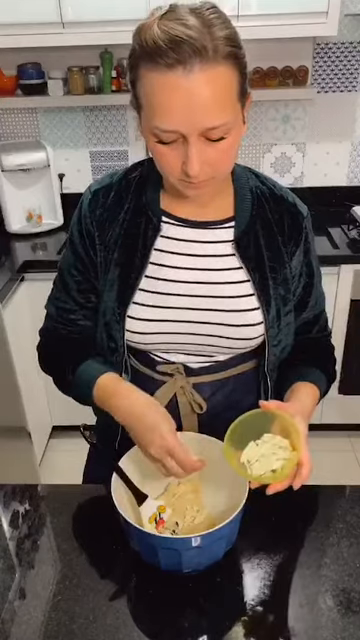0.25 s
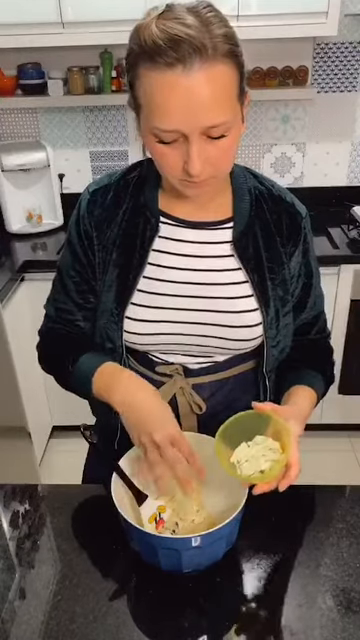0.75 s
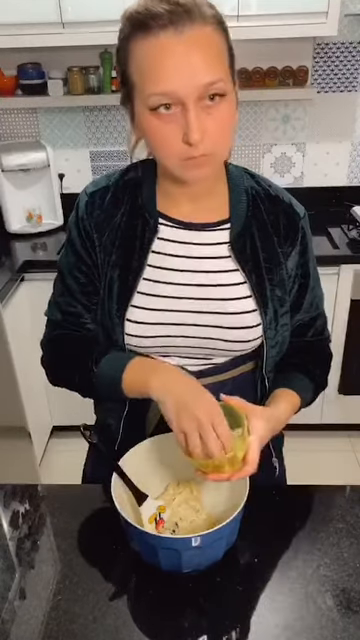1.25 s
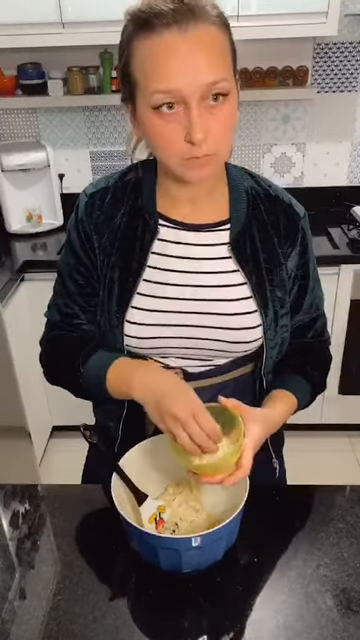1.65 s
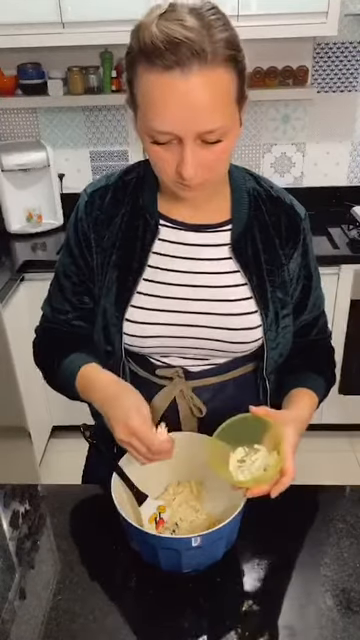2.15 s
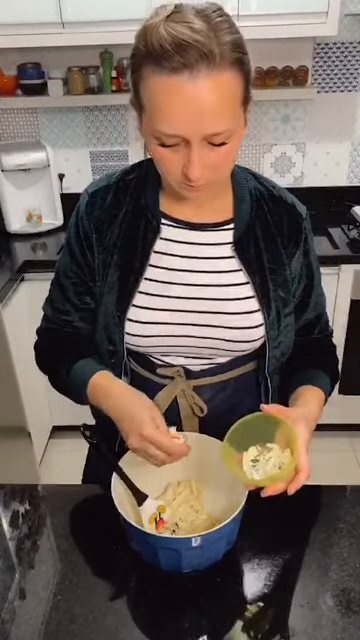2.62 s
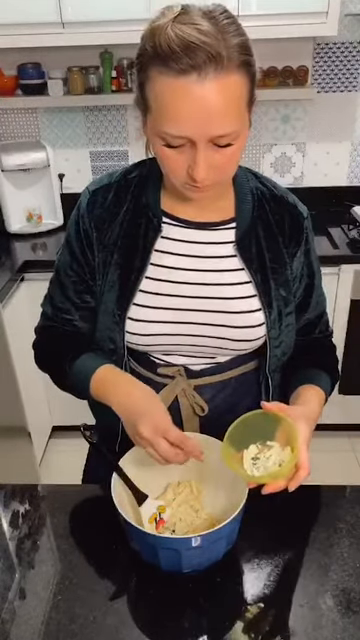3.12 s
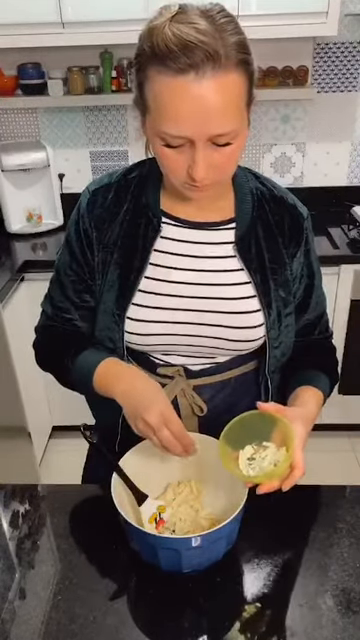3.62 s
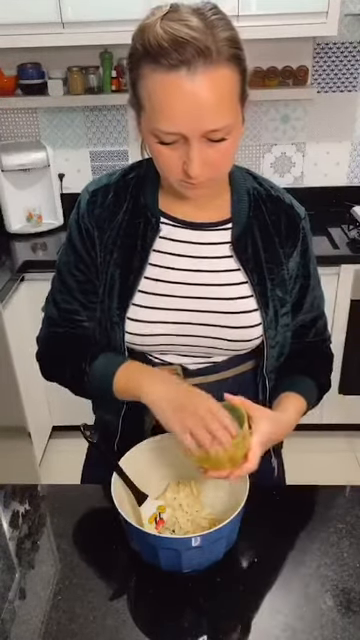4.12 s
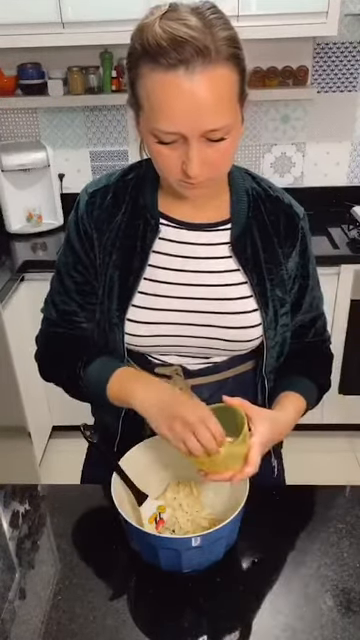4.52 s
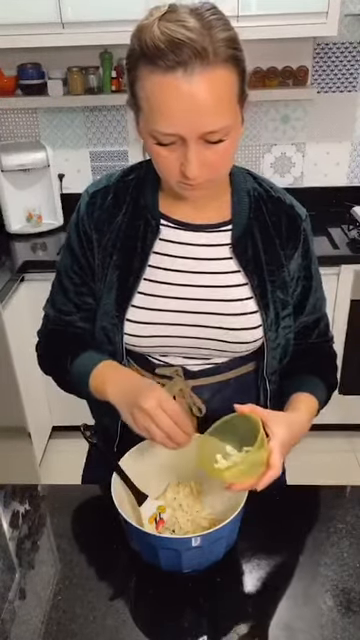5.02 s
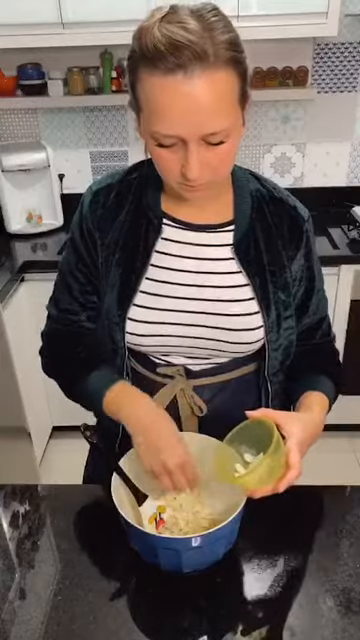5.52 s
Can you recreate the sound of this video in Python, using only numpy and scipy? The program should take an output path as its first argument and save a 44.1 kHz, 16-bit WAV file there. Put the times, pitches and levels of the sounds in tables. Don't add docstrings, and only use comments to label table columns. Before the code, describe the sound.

A close view of hands in a hard-surfaced kitchen, with constant low appliance hum and soft hiss beneath. Skin and sleeve rustle around 0.1-0.4 s, with a faint low bump and small ticks; a sharper tick at 0.5 s and a tight cluster of crisp chips on the glazed bowl near 0.92-0.96 s. At 1.2 s the hand enters a thin plastic cup with a soft thump; pieces tumble and knock the hollow wall, strongest about 1.4-1.7 s, until the hand leaves at 1.85 s. Sparse light clicks follow, with a duller lump and click at 2.77 s, a few bright ticks at 3.0-3.2 s and more near 3.95 s, amid faint rubbing and low counter rumbles. A second, quieter dig rattles the cup from 4.2 to 4.5 s. A few chips follow, then the loudest event, a hard bright snap at 5.47 s, before rustling continues to the end.

```python
import sys
import numpy as np
from scipy import signal
from scipy.fft import rfft, irfft
from scipy.io import wavfile
from scipy.ndimage import uniform_filter1d

SR = 44100
rng = np.random.default_rng(int(sys.argv[2]) if len(sys.argv) > 2 else 0)


def decibels_to_gain(level_db):
    exponent = np.asarray(level_db, float) / 20
    return 10 ** exponent


def put_to_file(sound):
    columns = np.atleast_2d(sound).T
    safe = np.clip(columns, -1, 1)
    whole_steps = np.round(safe * 32767)
    wavfile.write(sys.argv[1], SR, whole_steps.astype(np.int16))


N = 254236

# (frequency [Hz], density [dB per Hz])
HISS_SPECTRUM = [(88, -24), (150, -3.5), (172, 0), (275, -8.5), (398, -4.5), (612, -11.5), (1240, -17.5),
                 (2400, -28), (3840, -29), (5250, -10.5), (6390, -27), (10200, -35.5), (12900, -30.5),
                 (15100, -43), (16000, -39)]
HUM_SPECTRUM = [(26, -16), (45, -12), (86, 1.5), (129, -2), (157, -20.5), (190, -34), (250, -15),
                (420, -120)]
# (frequency [Hz], density [dB per Hz])
RUMBLE_SPECTRUM = [(22, -26), (30, -23), (40, -5), (48, -34), (56, -12)]
# (time [s], rumble level [dB], length [s], hum level [dB])
LEANS = [
    (0.113, -83, 0.084, -48.5),
    (2.21, -67, 0.31, -69),
    (2.724, -91, 0.046, -52),
    (3.107, -49, .12, -55),
    (3.522, -62, 0.9, -82),
    (5.05, -51, 0.17, -68),
    (5.577, -53, 0.12, -57),
    (5.75, -58, 0.12, -75),
]
# (time [s], length [s], fine hiss level [dB], low rub level [dB])
SLEEVE_SWEEPS = [
    (0.217, 0.23, -59.5, -55),
    (.91, .1, -62, -56),
    (2.16, .06, -69, -71),
    (2.694, .05, -65, -79),
    (3.42, 0.055, -69, -71),
    (3.926, .1, -63, -53.5),
    (4.237, 0.086, -64, -56),
    (5.167, 0.11, -63, -67),
]
# (frequency [Hz], density [dB per Hz])
RUB_SPECTRUM = [(1500, -17), (1900, -5), (3000, 0), (4500, 2.5), (7000, -3), (8800, -8.5), (10500, -67)]
SHEEN_SPECTRUM = [(7000, -1), (9000, 0.5), (11000, -3.5), (14000, -2), (15700, -7), (16000, -48)]
DULL_SPECTRUM = [(150, -14), (250, -2), (500, -2), (1100, 0.5), (1800, -3), (2600, -7.5)]
# (time [s], effort [dB], dryness [dB])
RUSTLE_EFFORT = [(0.0, -61.5, -36), (0.13, -44.5, -19), (0.27, -44, -22), (0.37, -57.5, -4),
                 (0.59, -55.5, -22), (0.83, -57, -7), (1.45, -47, -7), (1.76, -49.5, -18),
                 (1.86, -57.5, -14), (2.69, -58.5, -24), (3.21, -58, 4), (3.47, -57.5, -11.5),
                 (3.7, -54, -5), (4.2, -54, -3), (4.45, -46.5, -5.5), (4.75, -56.5, -11), (5.25, -52.5, -7),
                 (5.76, -50.5, -10)]
# (frequency [Hz], level [dB], t60 [s])
CUP_MODES = [(538, -8, 0.099), (693, -7, 0.075), (848, -3, 0.038), (1040, -7.5, 0.072), (1140, 5.5, 0.036),
             (1342, -8, 0.046), (2374, 1.5, 0.0052), (3654, -4, 0.015)]
# (time of push [s], stirring level [dB], dying away [dB per s])
CUP_PUSHES = [
    (1.192, -56, 47),
    (1.423, -34.5, 210),
    (1.55, -45.5, 17),
    (4.23, -47, 54),
    (4.4, -47, 25),
]
HAND_OUT_S = [1.84, 4.53]
# (time [s], peak level [dB], strongest ring [Hz])
CUP_KNOCKS = [(0.49, -52, 1277), (0.919, -43, 1280), (1.189, -47.5, 900), (1.227, -45, 1280),
              (1.273, -43, 1300), (1.336, -42.5, 1140), (1.41, -39, 1140), (1.423, -41, 880),
              (1.429, -55, 1190), (1.447, -54, 1140), (1.464, -44, 877), (1.542, -34, 1100),
              (1.616, -35, 1070), (1.663, -43, 750), (1.683, -49, 1130), (1.71, -38.5, 1087),
              (1.808, -43.5, 900), (2.016, -48.5, 1020), (2.325, -50, 1240), (2.76, -49, 960),
              (3.71, -54, 1280), (4.203, -44.5, 630), (4.226, -36, 800), (4.258, -45, 980),
              (4.373, -43, 1028), (4.4, -57, 1110), (4.426, -40.5, 1103), (4.523, -45, 1060),
              (4.73, -51.5, 1040), (5.101, -49, 1070)]
# (time [s], peak level [dB], ring [Hz], t60 [s])
SOFT_THUMPS = [
    (0.089, -48, 231, 0.67),
    (1.196, -41.5, 267, 0.075),
    (1.2, -35.5, 498, 0.035),
    (2.778, -40.5, 343, 0.092),
    (3.895, -48.5, 480, 0.16),
    (3.919, -49, 391, .35),
    (4.202, -42.5, 234, .08),
    (4.22, -45, 444, 0.051),
]
# (frequency [Hz], level [dB], t60 [s])
BOWL_MODES = [(3220, -28, 0.22), (3560, -6.5, 0.0053), (3818, -11.5, 0.11), (5670, 11, 0.05),
              (6400, -5, 0.038), (8280, -2.5, 0.059)]
# (time [s], peak level [dB], strongest ring [Hz])
DULL_CLICKS = [(1.1885, -41, 4550), (1.1984, -38, 4020), (1.4232, -40, 2230), (1.5408, -38.5, 2940),
               (1.6612, -47, 3270), (1.71, -42, 2340), (1.7855, -45.5, 2590), (1.8054, -50, 2310),
               (2.0193, -47, 1830), (2.768, -38.5, 2700), (3.9, -44, 1860), (4.215, -42, 4000),
               (4.2272, -35.5, 4870)]
# (time [s], peak level [dB], strongest ring [Hz], brightness [dB])
GLAZE_CHIPS = [(0.333, -45.5, 3300, -23), (0.394, -50, 3380, 3), (0.4922, -31.5, 3500, -13.5),
               (0.5184, -62, 3090, -12), (0.7929, -48, 2450, -1), (0.8707, -43, 9400, 0),
               (0.9196, -30.5, 3900, -9), (0.9282, -36.5, 3300, -3), (0.9387, -31.5, 3270, 9),
               (0.946, -36, 3220, 3), (0.959, -41, 4900, -19), (1.9963, -45.5, 4600, -21),
               (2.3221, -48, 4700, -7), (2.4173, -48.5, 4700, 1), (2.7587, -37, 3840, -45),
               (3.0092, -41, 7330, -3.5), (3.1779, -37, 6000, 1.5), (3.2057, -41, 4840, 2),
               (3.4873, -52, 5400, -6), (3.6327, -42.5, 3500, -15), (3.6744, -53, 4290, 8),
               (3.711, -53, 3290, -3), (3.876, -52, 5500, 10), (3.9516, -35, 6620, -10),
               (3.9648, -37.5, 8750, 9), (4.6368, -38.5, 3730, -9.5), (4.659, -42, 4200, -2),
               (4.8805, -58, 5560, 0), (5.413, -43, 3200, -2), (5.468, -19, 7980, 7.5)]
# (frequency [Hz], t60 [s])
KITCHEN_DECAY = [(200, 0.11), (1000, 0.42), (3000, 0.46), (8000, 0.36), (11500, 0.26), (15500, 0.16)]

HISS_DB, HUM_DB, HUM_SWELL_DB, RUMBLE_DB = -58.5, -53, 1, -101
DULL_DB, DULL_FOLLOW = -57, 0.84
PUSH_DB_PER_S, LIFT_DB_PER_S = 493, 203
LOW_DB, LOW_LOSS, MIDDLE_DB, MIDDLE_GAIN = -26, 0.1, 0, 0.37
HUMP_DB_PER_OCTAVE = 2
CLICK_BRIGHT_DB, CLICK_BODY_DB, CHIP_BODY_DB = -10, 1.5, -18.5
RING_DB, RING_T60_S = -9, 0.010
SPLINTER_SHARE, SPLINTER_S = 0.1, 0.008
BOWL_WET_DB, CUP_WET_DB = -2.5, -1


def evened(x):
    return x / np.sqrt(np.mean(x ** 2) + 1e-20)


def read(points, hz):
    f, value = np.transpose(points)
    return np.interp(np.log(hz + 1), np.log(f + 1), value)


def curve(rows, axis):
    rows = np.array(rows)
    return np.interp(np.arange(N) / SR, rows[:, 0], rows[:, axis], -120, -120)


def bell(s, length):
    return np.exp(-((np.arange(N) / SR - s) / (0.5 * length)) ** 2)


def add(mix, s, sound):
    part = mix[round(s * SR):][:len(sound)]
    part += sound[:len(part)]


def noise(spectrum, size, patchy_db, flicker_db):
    hz = np.fft.rfftfreq(size, 1 / SR)
    real, imaginary, patches = rng.standard_normal((N * 4 // size + 5, len(hz), 3)).T
    flicker = evened(uniform_filter1d(patches[0], size=3))
    patches = uniform_filter1d(patches, size=9, axis=0)
    patches = evened(uniform_filter1d(patches, size=12, axis=1))
    f = np.transpose(spectrum)[0]
    inside = (hz > f[0]) & (hz < f[-1])
    level_db = read(spectrum, hz)[:, None] + patchy_db * patches + flicker_db * flicker
    z = (real + 1j * imaginary) * decibels_to_gain(level_db) * inside[:, None]
    return evened(signal.istft(z, nperseg=size, noverlap=size - size // 4)[1][:N])


def ring(hz, db, t60, chance, spread_db, detune):
    t = np.arange(5000)[:, None] / SR
    hz = hz * (1 + detune * chance[1])
    envelope = decibels_to_gain(db + spread_db * chance[0] - 60 * t / t60)
    return (envelope * np.sin(2 * np.pi * hz * t) * np.sign(chance[2])).sum(1)


def struck(modes, rattle, rattle_s):
    contact = rattle * np.exp(-np.arange(len(rattle)) / SR / rattle_s)
    sound = signal.fftconvolve(modes, contact)
    return sound / np.sqrt(np.mean(sound[:180] ** 2))


def grains(templates, per_s, size_db):
    size = decibels_to_gain(size_db * np.minimum(rng.exponential(1, N), 4)) * (rng.random(N) < per_s / SR)
    which = rng.integers(0, len(templates), N)
    return evened(sum(signal.oaconvolve(size * (which == k), g)[:N] for k, g in enumerate(templates)))


def background():
    hiss = decibels_to_gain(HISS_DB) * noise(HISS_SPECTRUM, size=1024, patchy_db=0.8, flicker_db=0.3)
    hum = noise(HUM_SPECTRUM, size=4096, patchy_db=-0.1, flicker_db=HUM_SWELL_DB)
    rumble = noise(RUMBLE_SPECTRUM, size=4096, patchy_db=0.4, flicker_db=0.4)
    hum_level = decibels_to_gain(HUM_DB) + sum(decibels_to_gain(hum_db) * bell(s, length) for s, _, length, hum_db in LEANS)
    lean_level = decibels_to_gain(RUMBLE_DB) + sum(decibels_to_gain(db) * bell(s, length) for s, db, length, _ in LEANS)
    return hiss + hum_level * hum + lean_level * rumble


def sleeve():
    fine_spectrum = [(5000, -15), (9000, -2), (12500, -2.0), (15700, 4)]
    cloth_spectrum = [(140, -14), (230, 5.5), (500, -3), (1500, -13)]
    fine = noise(fine_spectrum, size=256, patchy_db=-2.0, flicker_db=-1.0)
    cloth = noise(cloth_spectrum, size=512, patchy_db=-2.2, flicker_db=-0.7)
    return sum(bell(s, length) * (decibels_to_gain(fine_db) * fine + decibels_to_gain(low_db) * cloth)
               for s, length, fine_db, low_db in SLEEVE_SWEEPS)


def rustle():
    t = np.arange(200) / SR
    crumbs = [np.sin(2 * np.pi * f * t) * np.exp(-t * f / 0.59) for f in np.geomspace(2600, 9000, 12)]
    rub = noise(RUB_SPECTRUM, size=256, patchy_db=1.3, flicker_db=1.1)
    rub = rub + 0.3 * grains(crumbs, per_s=900, size_db=2.5)
    sheen = noise(SHEEN_SPECTRUM, size=256, patchy_db=1.2, flicker_db=1.3)
    dull = noise(DULL_SPECTRUM, size=512, patchy_db=1.4, flicker_db=1.2)
    effort_db, dry_db = curve(RUSTLE_EFFORT, axis=1), curve(RUSTLE_EFFORT, axis=2)
    dull_db = DULL_DB + DULL_FOLLOW * (effort_db - DULL_DB)
    return decibels_to_gain(-8) * (decibels_to_gain(effort_db) * (rub + decibels_to_gain(dry_db) * sheen) + decibels_to_gain(dull_db) * dull)


def thumps():
    out, rise = np.zeros(N), np.minimum(np.arange(5000) / SR / 0.0036, 1)
    for s, peak_db, own_hz, t60 in SOFT_THUMPS:
        hz, db = own_hz * np.array([0.72, 1, 1.45]), np.array([-11, 0, -12])
        modes = ring(hz, db, t60, np.ones(3), spread_db=0, detune=0)
        add(out, s - 0.002, decibels_to_gain(peak_db) * rise * modes)
    return out


def rummage():
    hz, db, t60 = np.transpose(CUP_MODES)
    chances = rng.standard_normal((14, 3, len(hz)))
    taps = [ring(hz, db, 0.8 * t60, chance, spread_db=4.0, detune=0.06) for chance in chances]
    t, stirring = np.arange(N) / SR, 0
    for s, push_db, dying_db in CUP_PUSHES:
        out_s = min(o for o in HAND_OUT_S if o > s)
        fall_db = np.maximum(PUSH_DB_PER_S * (s - t), dying_db * (t - s))
        fall_db = fall_db + LIFT_DB_PER_S * np.maximum(t - out_s, 0)
        stirring = np.maximum(stirring, decibels_to_gain(push_db - fall_db))
    return grains(taps, per_s=600, size_db=1.57) * decibels_to_gain(-3.5) * stirring


def knocks():
    out, (hz, db, t60) = np.zeros(N), np.transpose(CUP_MODES)
    for s, peak_db, own_hz in CUP_KNOCKS:
        chance, rattle = rng.standard_normal((3, len(hz) + 1)), rng.standard_normal(300)
        chance[:2, -1] = 0
        near_db = -5.0 * abs(np.log2(hz / own_hz))
        level_db = np.append(db + near_db, 2)
        decay_s = np.append(0.6 * t60, 0.025)
        modes = ring(np.append(hz, own_hz), level_db, decay_s, chance, spread_db=3.0, detune=0.03)
        add(out, s - 0.001, decibels_to_gain(peak_db) * struck(modes, rattle, rattle_s=0.0012))
    return out


def crack_colour(bright_db, body_db):
    low_db = LOW_DB - LOW_LOSS * bright_db
    middle_db = low_db + MIDDLE_DB + MIDDLE_GAIN * bright_db
    high_db = low_db + bright_db
    return [(900, low_db + 0.9 * body_db - 5.5), (2650, low_db + 0.59 * body_db), (3150, low_db),
            (4000, low_db), (5800, middle_db - 2), (8500, high_db - 1), (10800, high_db - 4),
            (15500, high_db - 17), (16500, high_db - 37)]


def chips():
    out, (hz, db, t60) = np.zeros(N), np.transpose(BOWL_MODES)
    t, bins = np.arange(1024) / SR, np.fft.rfftfreq(1024, 1 / SR)
    splintering = np.exp(-t / 0.0028) + SPLINTER_SHARE * np.exp(-t / SPLINTER_S)
    hits = [(*row, CHIP_BODY_DB) for row in GLAZE_CHIPS]
    hits += [(*row, CLICK_BRIGHT_DB, CLICK_BODY_DB) for row in DULL_CLICKS]
    for s, peak_db, own_hz, bright_db, body_db in hits:
        chance = rng.standard_normal((3, len(hz) + 1))
        burst, rattle = rng.standard_normal(1024), rng.standard_normal(300)
        colour = crack_colour(bright_db, body_db)
        hump_db = -HUMP_DB_PER_OCTAVE * abs(np.log2((bins + 1) / own_hz))
        z = rfft(burst * splintering)
        z = z / np.sqrt(uniform_filter1d(abs(z) ** 2, size=7))
        crack = irfft(z * decibels_to_gain(read(colour, bins) + hump_db))
        crack = crack / np.sqrt(np.mean(crack[:90] ** 2)) * np.minimum(t / 0.00093, 1) * (t < 0.02)
        chance[:2, -1] = 0
        level_db = np.append(db + read(colour, hz) + 8, 0)
        decay_s = np.append(t60, RING_T60_S)
        modes = ring(np.append(hz, own_hz), level_db, decay_s, chance, spread_db=4.5, detune=0.0027)
        add(out, s - 0.0008, decibels_to_gain(peak_db - 0.23) * crack)
        add(out, s - 0.0008, decibels_to_gain(peak_db + RING_DB) * struck(modes, rattle, rattle_s=0.0022))
    return out


def kitchen(x):
    taps = np.zeros(SR // 2)
    at = np.arange(130, SR // 2 - 10, 10)
    taps[at + rng.integers(0, 10, at.shape)] = rng.choice([-1., 1.], at.shape)
    hz, t, z = signal.stft(taps, SR, nperseg=128)
    fading = decibels_to_gain(-60 * t / read(KITCHEN_DECAY, hz)[:, None])
    tail = signal.istft(z * fading, SR, nperseg=128)[1]
    return signal.fftconvolve(x, tail / np.linalg.norm(tail))[:N]


def scene():
    cup_bass_cut = signal.butter(4, 450, "high", fs=SR, output="sos")
    cup = signal.sosfilt(cup_bass_cut, rummage() + knocks()) + thumps()
    bowl = chips()
    wet = kitchen(decibels_to_gain(BOWL_WET_DB) * bowl + decibels_to_gain(CUP_WET_DB) * cup)
    return (background() + sleeve() + rustle() + cup + bowl + wet)[None]


def low_pass(x):
    return signal.sosfilt(signal.butter(12, 16480, fs=SR, output="sos"), x)


def record(dry):
    bass_cut = signal.butter(2, 33, "high", fs=SR, output="sos")
    mix = signal.sosfilt(bass_cut, dry)
    return low_pass(mix)


dry = scene()
out = record(dry)
put_to_file(out)
```